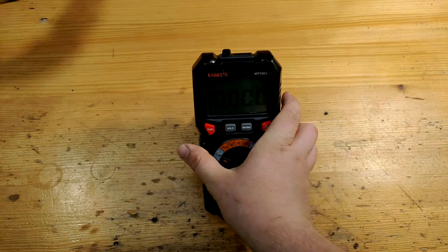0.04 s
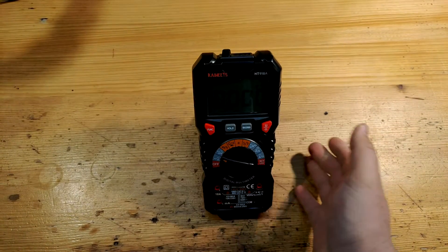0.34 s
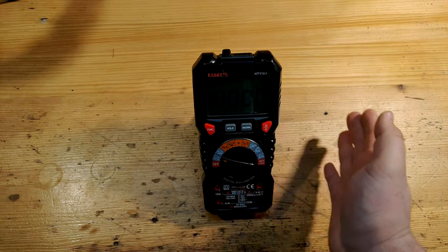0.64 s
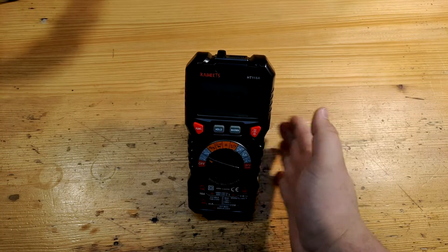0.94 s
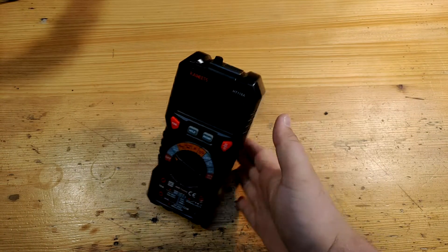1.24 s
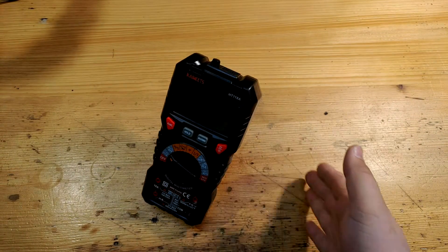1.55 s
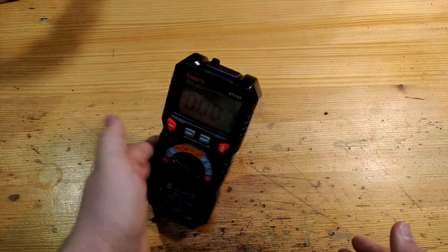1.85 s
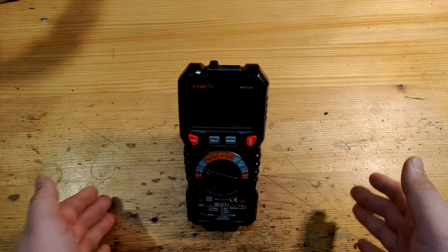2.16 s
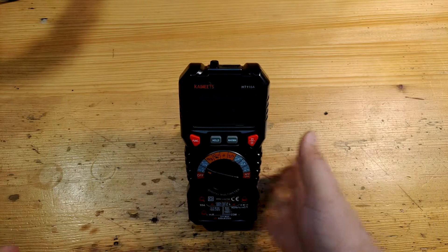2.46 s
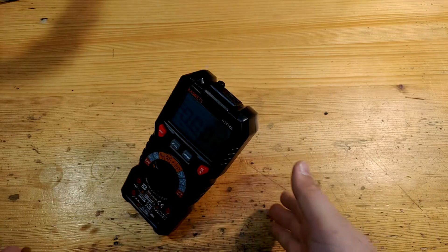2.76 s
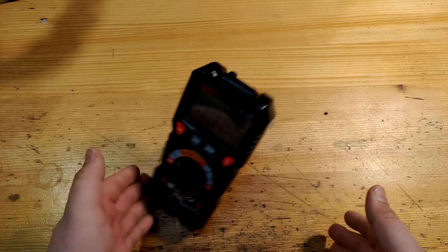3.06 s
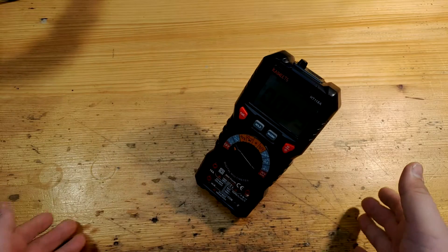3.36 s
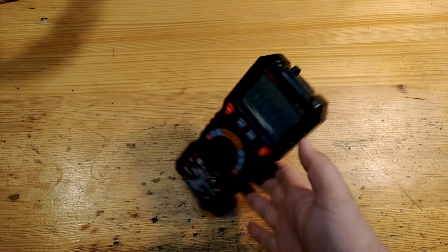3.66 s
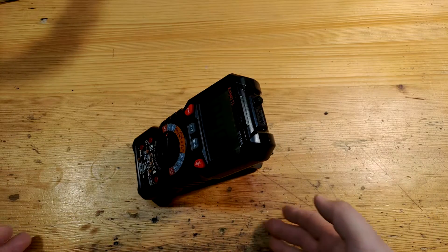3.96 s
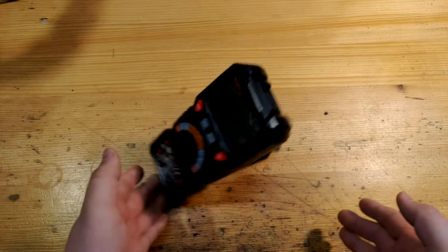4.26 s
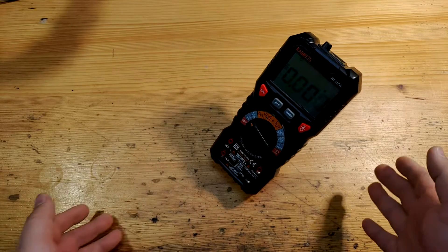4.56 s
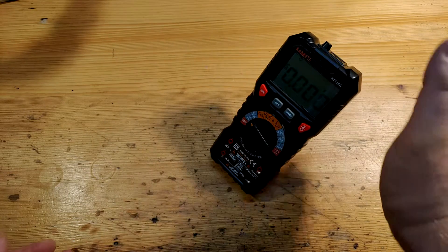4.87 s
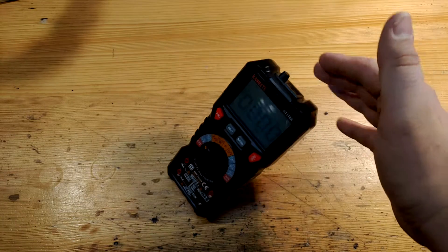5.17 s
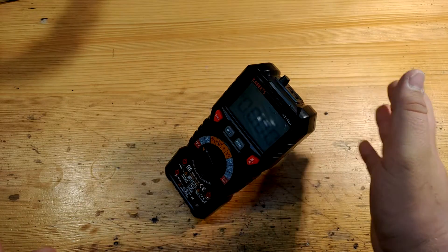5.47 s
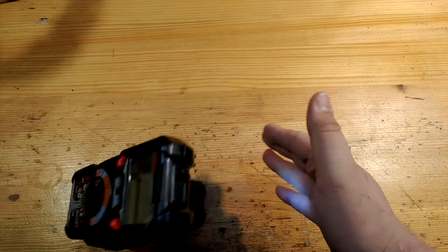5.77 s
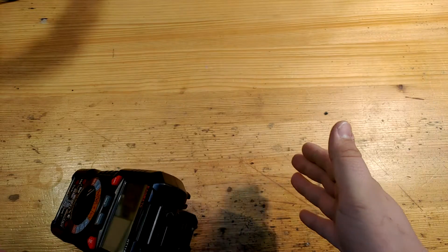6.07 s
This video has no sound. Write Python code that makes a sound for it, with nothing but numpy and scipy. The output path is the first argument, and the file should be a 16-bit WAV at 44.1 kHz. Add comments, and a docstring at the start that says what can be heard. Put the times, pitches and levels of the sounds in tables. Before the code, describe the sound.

A hand repeatedly shoves a rubber-sleeved multimeter standing on a wooden workbench. Light knocks come first, then harder, irregular blows, each with a low boom from the wood and a plastic crack. Between them the sleeve rubs softly, and the hard stand scrapes, drops back and bounces with sharp clacks. A last clatter and short skid end it. The sound is close, in a small room with a faint fan hum.

```python
"""A rubber-sleeved multimeter is shoved about by hand on its tilt stand on a wooden workbench.
Each blow makes the bench top boom and the plastic case crack and ring. Skin slaps the sleeve,
the sleeve rubs, and the hard stand skids, falls back and bounces.
A small room answers; a distant fan hums faintly."""
import sys
import numpy as np
from scipy import signal
from scipy.fft import rfft, irfft, next_fast_len
from scipy.io import wavfile
from scipy.ndimage import map_coordinates

SR = 44100
rng = np.random.default_rng(int(sys.argv[2]) if len(sys.argv) > 2 else 0)


def log_audio(samples):
    """Write samples as a 16-bit WAV file to the path given in sys.argv[1]."""
    # one column per channel
    frames = np.atleast_2d(samples).T
    # limit to full scale, then quantise
    limited = np.clip(frames, -1, 1)
    pcm = np.round(limited * 32767).astype(np.int16)
    wavfile.write(sys.argv[1], SR, pcm)


N = 273949

# room decay (frequency [Hz], t60 [s])
ROOM_DECAY = [(60, 0.43), (120, 0.4), (250, 0.47), (500, 0.34), (1400, 0.31), (3000, 0.28), (8000, 0.25),
              (15000, 0.16)]
# stereo image of meter and room (frequency [Hz], left-right correlation [-1..1])
COHERENCE = [(120, 0.96), (300, 0.95), (700, 0.34), (1400, 0.43), (2800, 0.043), (8000, 0.11)]
# microphone shading (frequency [Hz], left minus right [dB])
SHADING = [(100, 1.5), (400, 0), (1300, 1), (2800, -0.5), (4400, -4), (7000, -11.5), (9500, -20.5),
           (12000, -7), (15500, -7)]
# fan tones (frequency [Hz], level [dB])
FAN_TONES = [(118.4, -54), (188.4, -69.5), (323.0, -64), (371.4, -61), (866.7, -76.5)]
# room air and microphone hiss (frequency [Hz], density [dB])
AIR_SPECTRUM = [(15, -55), (25, -15), (70, -14), (120, 2), (148, -10.5), (195, -2), (270, -16), (365, -14),
                (430, -20.5), (900, -24.5), (2500, -30), (8500, -41), (10100, -51.5), (12000, -41),
                (15700, -37.5)]
# stereo image of the air (frequency [Hz], left-right correlation [-1..1])
AIR_COHERENCE = [(60, 0.9), (180, 0.93), (550, 0.33), (1650, -0.21), (4970, 0.16), (15000, -0.17)]
# sleeve rolls as the meter tilts (time [s], length [s], level [dB])
RUB_STROKES = [(-0.04, 0.11, -45.5), (2.29, 0.41, -55), (2.65, 0.059, -33.5), (3.755, 0.058, -37.5),
               (3.88, 0.067, -32), (4.375, 0.088, -38.5), (5.12, 0.2, -40), (5.725, 0.1, -31.5)]
# rubber friction (frequency [Hz], density [dB])
RUB_SPECTRUM = [(90, -17), (190, -4.5), (280, -1), (370, -7.5), (480, -28), (700, -16), (1100, -28.5),
                (3000, -39), (15000, -63.5)]
# meter rocks onto a rubber corner
# (time [s], boom [dB], knock [dB], brightness [dB/band], hollow note [Hz])
ROCK_BLOWS = [(-0.016, -21, -53, -12, 432), (1.023, -29, -50, -8.5, 443), (1.323, -15.5, -40.5, -4.5, 840),
              (1.422, -29, -67.5, -17.5, 430), (2.026, -20, -42.5, -7, 490), (2.364, -27, -48, -6.5, 440),
              (2.429, -45, -53.5, -13.5, 695), (2.478, -31, -49, -7, 650), (2.635, -19.5, -42.5, -2, 423),
              (2.665, -13, -38.5, -11, 422), (3.195, -17.5, -45.5, -11, 490), (3.518, -35, -60.5, 1, 1067),
              (3.898, -12, -46.5, -8.5, 423), (3.921, -31.5, -42, -0.5, 882), (4.407, -25, -61, -8.5, 428),
              (5.199, -19, -65, -5, 440)]
# hand shoves the meter (time [s], boom [dB], knock [dB], brightness [dB/band], skin [dB])
SHOVE_BLOWS = [(0.895, -31.5, -45, -1, -47), (1.289, -45, -52, 1.5, -53), (1.295, -16, -45, 4, -44),
               (1.974, -25, -40.5, -3, -39.5), (1.985, -28, -41, -2.5, -46),
               (2.251, -15.5, -37.5, -7, -69.5), (2.613, -24, -41, -1, -41.5),
               (3.144, -13.5, -46.5, -2, -46), (3.753, -23.5, -47, 0.5, -46),
               (4.353, -10, -45.5, -0.5, -43.5), (5.115, -12.5, -52.5, 3.5, -52),
               (5.125, -18, -44.5, 0, -39), (5.682, -14, -44, -3.5, -43)]
# meter falls onto its stand (time [s], boom [dB], knock [dB], brightness [dB/band], hollow note [Hz],
# contacts [count], first flight [s], bounce loss [dB], other foot lag [s], other foot level [dB])
DROP_BLOWS = [(2.662, -26, -38, -2, 643, 2, 0.043, 7, -0.012, -2),
              (3.233, -20.5, -26.5, -0.43, 1073, 3, 0.056, 8.5, 0.0011, 1),
              (3.83, -23.5, -33.5, 0, 845, 2, 0.043, 8.5, 0.011, -5),
              (4.458, -22.5, -22, 0.5, 983, 3, 0.079, 3.5, -0.0041, -4.5),
              (5.25, -26.5, -33, 0, 846, 2, 0.0695, 4, 0.012, -11),
              (5.805, -19, -31.5, 1, 670, 3, 0.077, 5.5, 0.01, -4.5)]
# bench top modes (frequency [Hz], level [dB], t60 [s])
BENCH_MODES = [(71, -13.5, 0.25), (101.35, -28.5, 0.91), (125.06, -13, 0.46), (211.9, -18, 0.27),
               (307.5, -18.5, 0.12)]
# case and bench ringing together (frequency [Hz], level [dB], t60 [s])
CASE_MODES = [(205.5, -10, 0.22), (270.4, -1.5, 0.22), (353, 10.5, 0.063), (415.4, 3.5, 0.13),
              (488.8, 5.5, 0.17), (604, -3, 0.38), (760, -25, 0.19), (873.6, 7.5, 0.08), (951, -12.5, 0.16),
              (983, -14.5, 0.036), (1077, -14.5, 0.19), (1276, 1, 0.045), (1404, -18, .08),
              (1769, 5, 0.035), (1859, 5.5, 0.068), (2030, -13, 0.045), (2167, -13, 0.15),
              (2615, -11, 0.21), (2650, -6, 0.1), (2776, -11, 0.33), (2960, 3, 0.048), (3040, 2, 0.046),
              (3420, -8, 0.074), (3600, -7.5, 0.081), (4250, 3.5, 0.052), (4630, 1.5, 0.049),
              (4570, -41, 0.084), (5300, -33, 0.062), (6000, -4.5, 0.069), (6500, -35, 0.11),
              (6570, -10, 0.089), (7400, 5.5, 0.035)]
# plastic on wood (frequency [Hz], density [dB])
CRACK_SPECTRUM = [(60, -20.5), (200, 9), (450, -9.5), (690, 2.5), (1000, -7.5), (1800, -3.5), (2250, -15),
                  (2800, -5.5), (4400, -5.5), (5300, -14.5), (8000, -17), (9200, -23), (9800, -34),
                  (11500, -28.5), (15500, -36.5)]
# skin on rubber (frequency [Hz], density [dB])
SKIN_SPECTRUM = [(1500, -47), (5000, 3.5), (8300, 2.5), (10200, -9.5), (12000, -3.5), (15800, 0)]
# stand skids over wood (time [s], length [s], level [dB])
SKID_STROKES = [(1.305, 0.038, -38), (1.385, 0.021, -49), (1.981, 0.075, -46), (2.628, 0.044, -28),
                (2.715, 0.059, -41.5), (3.25, 0.18, -41), (3.775, 0.13, -34.5), (3.81, 0.062, -38),
                (5.89, 0.14, -42.5)]
# case resonances the skids ring through (frequency [Hz], width [Hz], level [dB])
SKID_MODES = [(560, 150, 1.5), (890, 43, 5.5), (1220, 88, 4), (1616, 230, -0.5), (1816, 58, 8.5),
              (2600, 370, -3.5), (3720, 150, -6.5), (4360, 270, -11), (5850, 240, -13.5),
              (8000, 720, -17.5)]
# thud, knock, clack and click bands (low edge [Hz], high edge [Hz])
BANDS_HZ = [(170, 380), (380, 1150), (1150, 2500), (2500, 18000)]
# blow colour (thud [dB], knock [dB], clack [dB], click [dB])
SHOVE_COLOUR_DB, ROCK_COLOUR_DB = (-2.1, 0.69, 0.99, -1.7), (2, -1, -1, -5)
DROP_COLOUR_DB, OTHER_FOOT_COLOUR_DB = (-10.5, -1.5, 1, -0.5), (-4.5, -0.5, -0.5, 0)
# bench flex (pitch [Hz], swell [s])
SHOVE_BOOM, ROCK_BOOM, DROP_BOOM = (107.7, 0.021), (111.8, 0.028), (99.7, 0.028)

SHOVE_NOTE_HZ, OTHER_FOOT_NOTE_HZ = 669, 465.5
SHOVE_CHATTER_S, ROCK_CHATTER_S, DROP_CHATTER_S = 0.0082, 0.017, 0.0066


def amp(db):
    """Decibels to gain."""
    return 10 ** (np.asarray(db) / 20)


def rms(x):
    """Root mean square."""
    return np.sqrt(np.mean(x ** 2) + 1e-20)


def along(points, hz):
    """Interpolate (frequency [Hz], value) points on a log axis."""
    knots_hz, values = np.transpose(points)
    return np.interp(np.log(hz + 1), np.log(knots_hz + 1), values)


def filtered(x, response):
    """Apply a frequency response."""
    n = x.shape[-1]
    size = next_fast_len(n + 4096)
    return irfft(rfft(x, size) * response(np.fft.rfftfreq(size, 1 / SR)), size)[..., :n]


def wobble(rate_hz):
    """Smooth random curve."""
    knots = rng.standard_normal(int(N * rate_hz / SR) + 4)
    return map_coordinates(knots, [np.arange(N) * rate_hz / SR])


def noise(size, spectrum, coherence=COHERENCE):
    """Coloured stereo noise, rms 1."""
    def response(hz):
        angle = np.arccos(np.clip(along(coherence, hz), -1, 1)) / 2
        return amp(along(spectrum, hz)) * [np.cos(angle), np.sin(angle)]
    mid, side = filtered(rng.standard_normal((2, size)), response)
    pair = np.array([mid + side, mid - side])
    return pair / rms(pair)


def add(track, time_s, sound):
    """Mix a sound in at time_s."""
    start = round(time_s * SR)
    part = sound[..., max(-start, 0):N - start]
    track[:, max(start, 0):max(start, 0) + part.shape[-1]] += part


def in_room(x, wet_db, onset_s=0.0048):
    """Direct sound plus a room tail with frequency-dependent decay."""
    hz, t, spectra = signal.stft(noise(SR * 3 // 4, [(1, 0)]), SR, nperseg=256)
    decay = amp(-60 * t / along(ROOM_DECAY, hz)[:, None])
    tail = signal.istft(spectra * decay, SR, nperseg=256)[1]
    tail *= 1 - np.exp(-(np.arange(tail.shape[1]) / SR / onset_s) ** 2)
    tail *= amp(wet_db) / np.linalg.norm(tail[0])
    tail[:, 0] = 1  # direct path
    return signal.fftconvolve(np.atleast_2d(x), tail, axes=1)


def fan(air_db=-52, hum_db=-1, drift_rad=0.19, waver_db=2.5):
    """Distant fan: unsteady low tones over soft air noise."""
    t = np.arange(N) / SR
    hum = np.zeros(N)
    for hz, db in FAN_TONES:
        gain = amp(db + hum_db + waver_db * wobble(24))
        hum += gain * np.sin(2 * np.pi * hz * t + drift_rad * wobble(22))
    return hum + amp(air_db) * noise(N, AIR_SPECTRUM, AIR_COHERENCE)


def friction(strokes, spectrum, grain_db, slip_hz):
    """Stick-slip strokes: noise in uneven grains."""
    force = np.zeros((1, N))
    for time_s, length_s, db in strokes:
        add(force, time_s, amp(db) * np.sqrt(np.hanning(int(length_s * SR))))
    slips = amp(grain_db * wobble(slip_hz))
    return force * slips / rms(slips) * noise(N, spectrum)


def sleeve_rubs(level_db=-1):
    """Soft rubber grumbles as the meter tilts."""
    grumble = friction(RUB_STROKES, RUB_SPECTRUM, grain_db=-1.0, slip_hz=120)
    return in_room(amp(level_db) * grumble, wet_db=-9.0)[:, :N]


def bench_booms(rise_s=0.0057, level_db=-1):
    """The meter's weight loads the bench top over a few cycles; its low modes swing on."""
    out, t = np.zeros((2, N)), np.arange(SR // 2) / SR
    ring = sum(amp(db - 60 * t / t60_s) * np.sin(2 * np.pi * hz * t) for hz, db, t60_s in BENCH_MODES)
    ring *= 1 - np.exp(-t / rise_s)
    kinds = [(SHOVE_BLOWS, SHOVE_BOOM), (ROCK_BLOWS, ROCK_BOOM), (bounces(), DROP_BOOM)]
    for blows, (hz, swell_s) in kinds:
        push = t / swell_s * np.exp((1 - (t / swell_s) ** 2) / 2)
        boom = push ** 1.43 * np.sin(2 * np.pi * hz * t) + ring
        for time_s, boom_db, *_ in blows:
            add(out, time_s, in_room(amp(boom_db + level_db) * boom, wet_db=-10.5))
    return out


def case_strikes():
    """All blows on the case (time [s], band levels [dB], hollow note [Hz], chatter [s])."""
    def levels(colour_db, knock_db, bright_db):
        return knock_db + np.array(colour_db) + bright_db * (np.arange(len(colour_db)) - 1)
    rows = []
    for time_s, _, db, bright_db, _ in SHOVE_BLOWS:
        rows.append((time_s, levels(SHOVE_COLOUR_DB, db, bright_db), SHOVE_NOTE_HZ, SHOVE_CHATTER_S))
    for time_s, _, db, bright_db, hz in ROCK_BLOWS:
        rows.append((time_s, levels(ROCK_COLOUR_DB, db, bright_db), hz, ROCK_CHATTER_S))
    # the two feet land slightly apart
    for time_s, _, db, bright_db, hz, chatter_s, lag_s, other_db in bounces():
        rows.append((time_s, levels(DROP_COLOUR_DB, db, bright_db), hz, chatter_s))
        foot_db = levels(OTHER_FOOT_COLOUR_DB, db + other_db, bright_db)
        rows.append((time_s + lag_s, foot_db, OTHER_FOOT_NOTE_HZ, chatter_s))
    return rows


def plastic_crack(chatter_s, force_db, strike_t60_s=0.03, rattle_t60_s=0.22, detune=0.0019):
    """Loose plastic parts chatter and set the modes ringing, hard blows most."""
    t = np.arange(SR // 4) / SR
    spikes_db = 3 * np.interp(t, t[::32], rng.standard_normal(len(t[::32])))
    strike = amp(4 - 60 * t / strike_t60_s)
    taps = amp(spikes_db) * np.exp(-(t / chatter_s) ** 2)
    rattle = amp(-14 - 60 * t / rattle_t60_s)
    crack = noise(len(t), CRACK_SPECTRUM) * (strike + taps + rattle)
    hz, db, t60_s = np.transpose(CASE_MODES)[:, :, None]
    # each contact point loads and favours the modes differently
    hz = hz * (1 + detune * rng.standard_normal(hz.shape))
    db = db + 2 * rng.standard_normal(hz.shape)
    # high modes reach the two microphones out of step
    spread_rad = 0.63 * (1 - along(COHERENCE, hz))
    phase = rng.uniform(0, 2 * np.pi, hz.shape) + spread_rad * rng.standard_normal((2, *hz.shape))
    modes = amp(db - 60 * t / t60_s) * np.sin(2 * np.pi * hz * t + phase)
    ring = modes.sum(axis=1) * (1 - np.exp(-2 * t / chatter_s))
    return crack + amp(-4 + 0.15 * force_db) * ring


def case_knocks(hollow_db=-2, hollow_t60_s=0.057):
    """Rubber corners thud and knock, the bare stand clacks and clicks; each has a hollow note."""
    def unit_attack(x):
        return x / rms(x[..., :SR // 64])
    out, t = np.zeros((2, N)), np.arange(SR // 4) / SR
    bands = [signal.butter(4, edges, 'band', fs=SR, output='sos') for edges in BANDS_HZ]
    for time_s, band_db, hz, chatter_s in case_strikes():
        crack = plastic_crack(chatter_s, force_db=band_db[2])
        thud, knock, clack, click = [unit_attack(signal.sosfilt(band, crack)) for band in bands]
        envelope = amp(-60 * t / hollow_t60_s) * (1 - np.exp(-2 * t / chatter_s))
        hollow = unit_attack(envelope * np.sin(2 * np.pi * hz * t))
        knock = unit_attack(knock + amp(hollow_db) * hollow)
        blow = sum(gain * part for gain, part in zip(amp(band_db), (thud, knock, clack, click)))
        add(out, time_s, in_room(blow, wet_db=-11.5))
    return out


def skin_slaps(t60_s=0.065):
    """Skin on rubber: a short, bright hiss."""
    out, t = np.zeros((2, N)), np.arange(SR // 8) / SR
    for time_s, *_, skin_db in SHOVE_BLOWS:
        hiss = amp(skin_db - 60 * t / t60_s) * noise(len(t), SKIN_SPECTRUM)
        add(out, time_s, in_room(hiss, wet_db=-6.5))
    return out


def stand_skids(level_db=9):
    """The hard stand rasps on wood, and the rasp sings in the meter case's resonances."""
    def resonances(f):
        return sum((-1) ** k * amp(db) * 1j * f * width_hz / (hz * hz - f * f + 1j * f * width_hz)
                   for k, (hz, width_hz, db) in enumerate(SKID_MODES))
    rasp = friction(SKID_STROKES, [(200, -4.5), (8000, -2.5), (10000, -1.5)], grain_db=-3.5, slip_hz=500)
    return in_room(amp(level_db) * filtered(rasp, resonances), wet_db=-10.0)[:, :N]


def bounces(flight_ratio=0.73, loss_power=0.94, chatter_ratio=1.42, dulling_db=1.64):
    """Stand landings, each bounce shorter, weaker, duller and looser than the last."""
    rows = []
    for time_s, boom_db, knock_db, bright_db, hz, count, flight_s, loss_db, lag_s, other_db in DROP_BLOWS:
        for k in range(round(count)):
            lost_db = loss_db * k ** loss_power
            chatter_s = DROP_CHATTER_S * chatter_ratio ** k
            rows.append((time_s, boom_db - lost_db, knock_db - lost_db, bright_db - dulling_db * k,
                         hz, chatter_s, lag_s, other_db))
            time_s += flight_s * flight_ratio ** k
    return rows


def scene():
    """Meter and fan; the left microphone is shaded from the bench's treble."""
    def shade(hz):
        ratio = amp(along(SHADING, hz))
        return np.array([ratio, np.ones_like(hz)]) * np.sqrt(2 / (1 + ratio ** 2))
    meter = skin_slaps() + bench_booms() + case_knocks() + stand_skids() + sleeve_rubs()
    return filtered(meter, shade) + fan()


def record(dry, top_hz=15900):
    """Camera band limit: brick-wall low-pass."""
    return filtered(dry, lambda hz: hz < top_hz)


dry = scene()
out = record(dry)
log_audio(out)
```